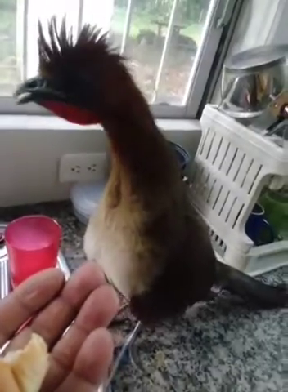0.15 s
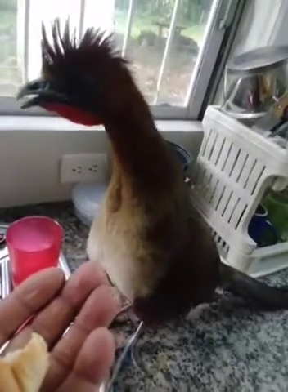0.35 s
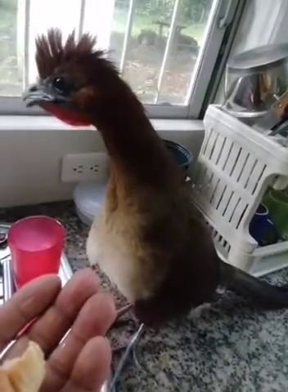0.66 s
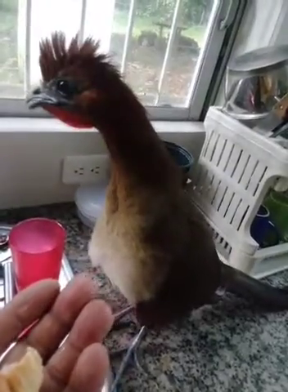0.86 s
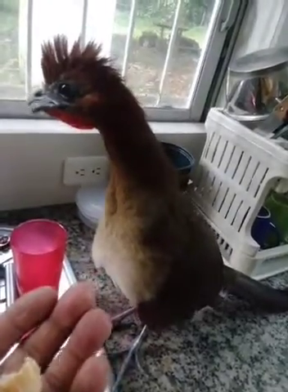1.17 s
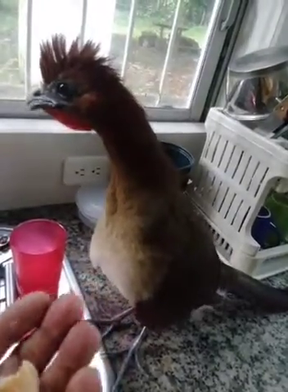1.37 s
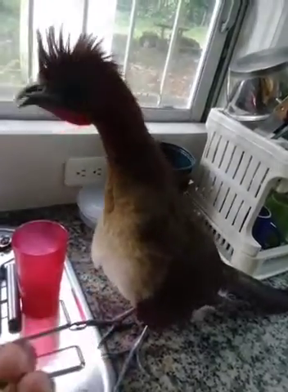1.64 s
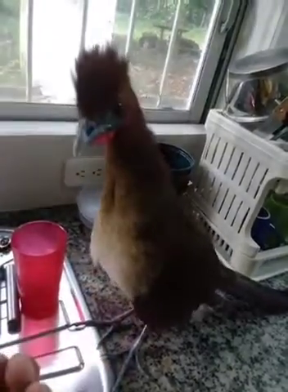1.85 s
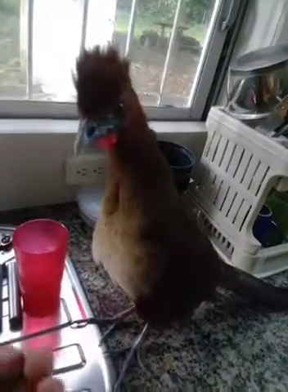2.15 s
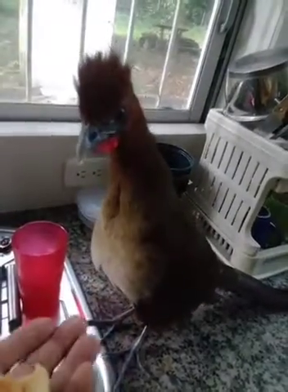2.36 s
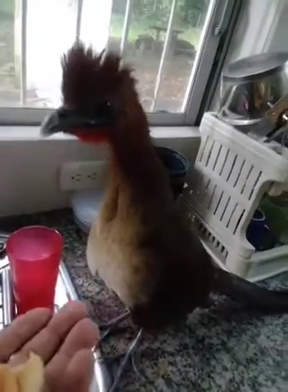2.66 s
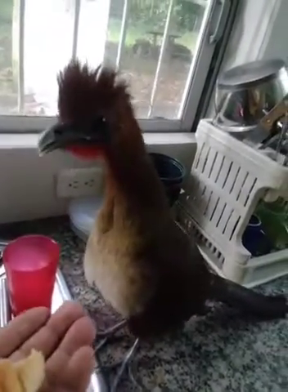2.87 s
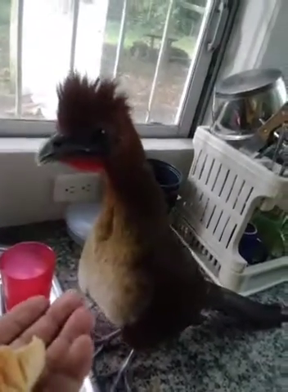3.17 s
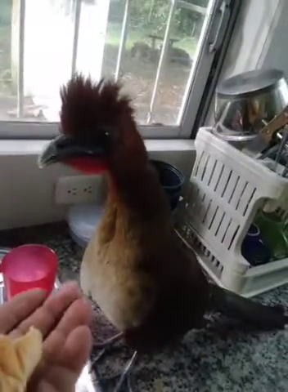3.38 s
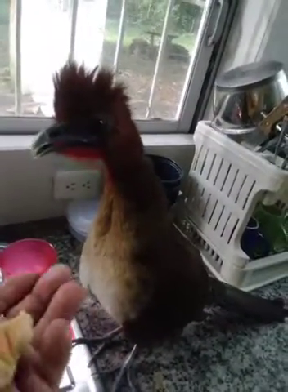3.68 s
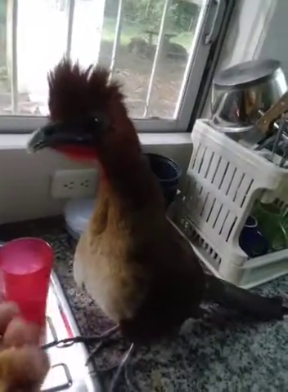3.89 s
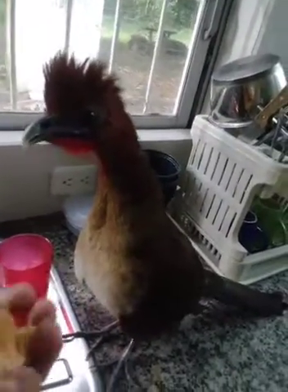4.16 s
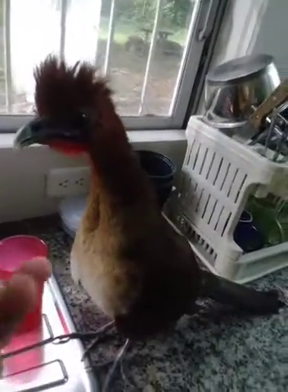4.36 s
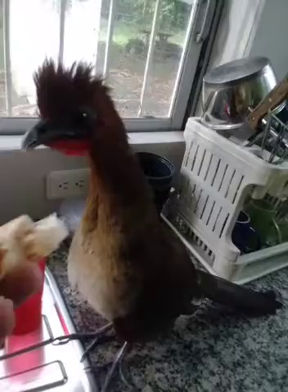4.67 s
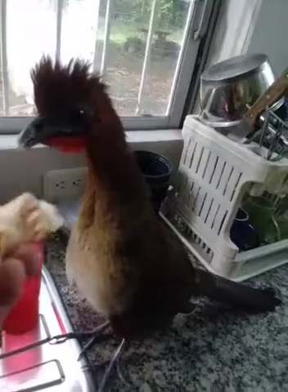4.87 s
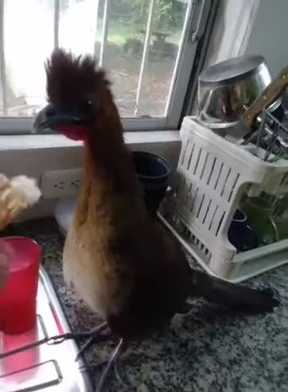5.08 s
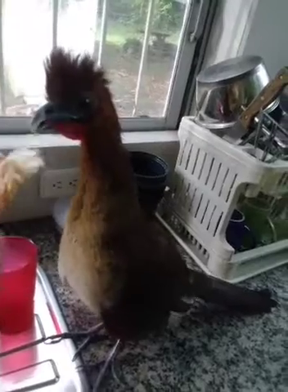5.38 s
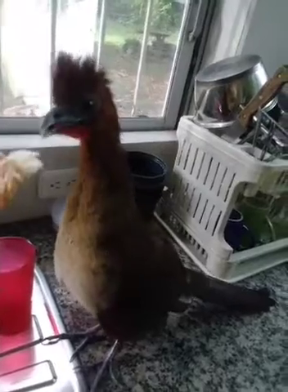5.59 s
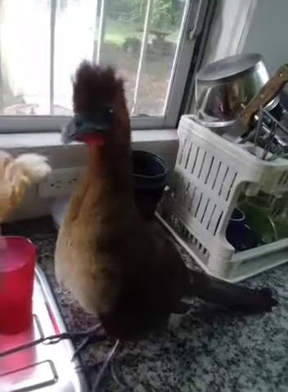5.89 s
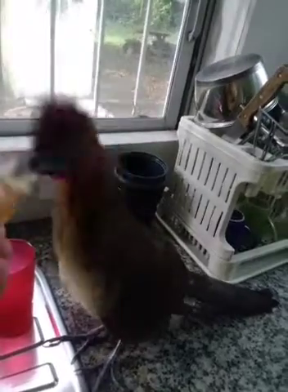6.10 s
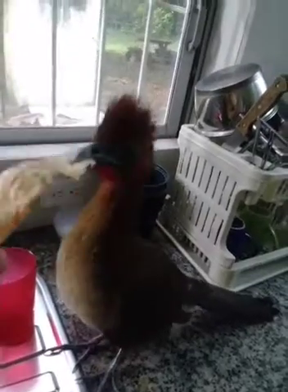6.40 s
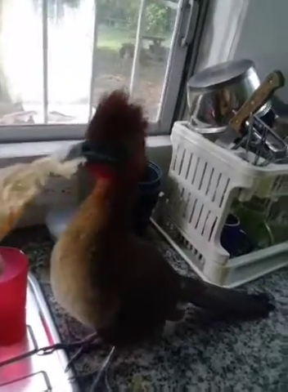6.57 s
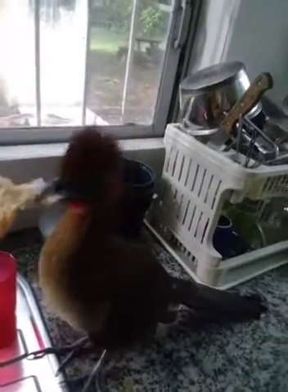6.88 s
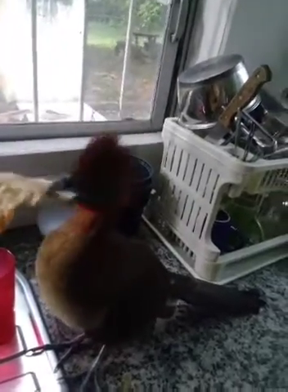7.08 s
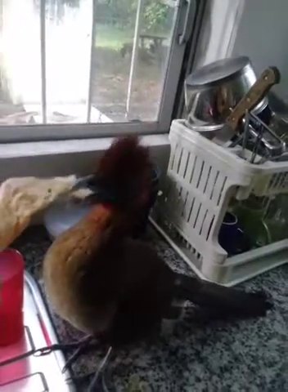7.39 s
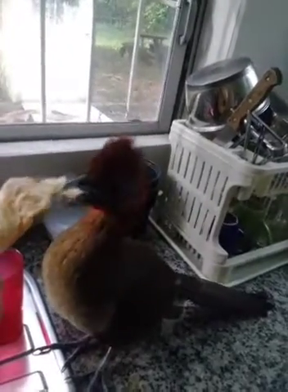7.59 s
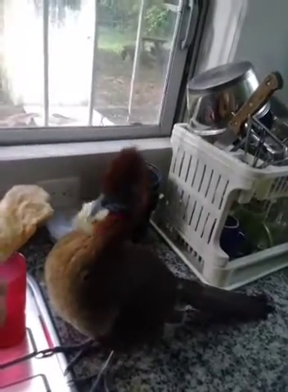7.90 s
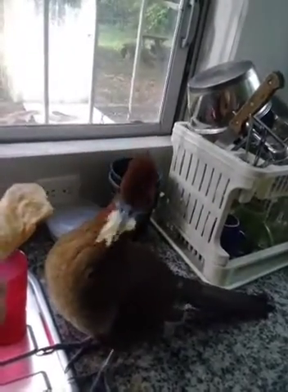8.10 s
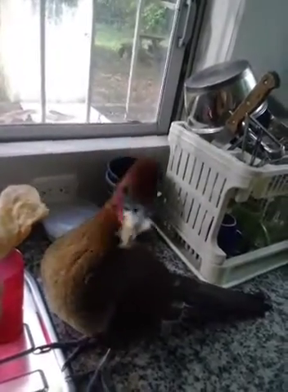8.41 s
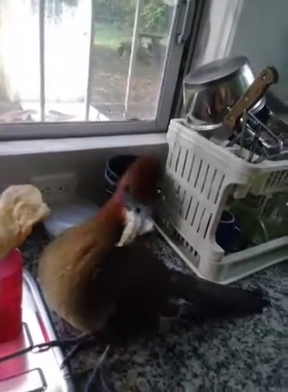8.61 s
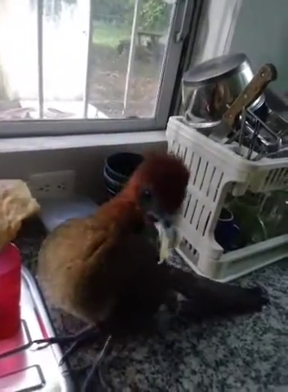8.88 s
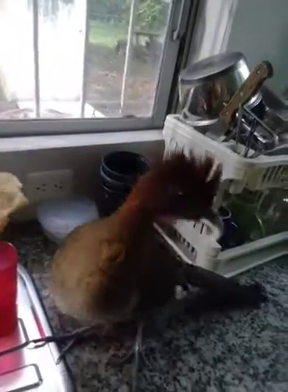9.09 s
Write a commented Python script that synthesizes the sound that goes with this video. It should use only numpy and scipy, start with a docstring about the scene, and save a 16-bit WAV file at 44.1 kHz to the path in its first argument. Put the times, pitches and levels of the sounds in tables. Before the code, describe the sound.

A large bird, a chachalaca, calls close by in a hard-walled kitchen. From the very start it repeats one harsh pattern: three quick, raspy barks, then a longer cry that begins as a croak, leaps to a clear high note and cracks back down into a rasp. The pattern comes about every 0.8 seconds, eight times, loud and even until about 6.3 seconds. From around 6.5 seconds the bird lowers its head and the calls turn softer, lower and more muffled, with looser spacing between barks. Quieter cries come near 7, 7.9 and 8.9 seconds, and one very faint coo sounds at about 7.3 seconds. Each call has a short, dense room echo. A faint refrigerator-like hum and soft room air continue underneath throughout. The small microphone thins the bass of the calls.

```python
"""In a hard-walled kitchen a chachalaca calls close by: a few short barks, then one long cry, repeated.
Its voice organ, the syrinx, rasps in uneven pulses when slack; pulled tight it sings clean and jumps
between the resonances of the long windpipe. Later the bird lowers its head to feed and calls more softly.
A hum like a refrigerator's lies below, and a small microphone thins the bass of the calls."""
import sys
import numpy as np
from scipy import signal
from scipy.fft import rfft, irfft
from scipy.io import wavfile
from scipy.ndimage import uniform_filter1d

SR = 44100
rng = np.random.default_rng(int(sys.argv[2]) if len(sys.argv) > 2 else 0)


def to_wav(s):
    """Save 16-bit WAV."""
    ch = np.atleast_2d(s).T  # columns
    pcm = np.round(np.clip(ch, -1, 1) * 32767)  # PCM
    wavfile.write(sys.argv[1], SR, pcm.astype(np.int16))


N = 407925

# tones of the motor: f/Hz, level/dB
HUM_TONES = [(121, -81), (241, -65), (619, -82), (10767, -90)]
# tone colour of the room air: f/Hz, relative level/dB
AIR_SPECTRUM = [(30, -42), (60, -34), (120, -18), (300, -7.5), (700, -12.5), (2000, -16), (3200, -28),
                (6000, -37.5), (10000, -41.5), (15800, -36)]
# how long echoes take to fade by 60 dB: f/Hz, t/s
ECHO_TIMES = [(300, 0.72), (1000, 0.39), (2800, 0.59), (7000, 0.48), (13000, 0.32)]
# windpipe resonances, head raised: f/Hz, width/Hz, gain/dB
WINDPIPE = [(360, 368, -9.5), (842, 243, -4), (1226, 186, -4.5), (1767, 180, -3.5), (1965, 373, -6),
            (2424, 447, -10)]
# the same, head lowered: f/Hz, width/Hz, gain/dB
WINDPIPE_LOWERED = [(414, 286, 0.5), (766, 107, 8.5), (1180, 71, 8), (1796, 294, 1), (2180, 252, -3),
                    (2585, 233, -0.5), (2636, 725, -7), (3130, 117, -6)]
# resonances of the beak and the airy hiss above them: f/Hz, width/Hz, gain/dB
BEAK_MODES = [(3130, 450, -1), (6150, 2700, -27), (3940, 1050, 2.5), (4656, 613, 8.5), (5282, 323, 2.5),
              (7370, 1700, -13), (10430, 3200, -21)]
# how the beak's opening colours the rasp: t/s, mouth resonance f/Hz, treble level/dB
BEAK_OPENING = [(0, 1500, -18.5), (3, 1420, -19.5), (6, 1620, -17), (6.58, 1570, -21.5), (6.84, 1150, -35),
                (6.95, 1360, -28), (7.64, 1310, -34), (7.8, 1580, -26.5), (7.9, 2270, -20),
                (8.9, 2190, -20)]
# harmonics 1-6 of the clean tone at the syrinx: relative level/dB
HARMONICS_DB = [5, 14, 16.5, 2, -6, 0.5]
# one soft coo: start t/s, loudest t/s, end t/s, f/Hz, level/dB
SOFT_COO = (7.28, 7.33, 7.47, 505, -43)
# short barks: start t/s, top f/Hz, time until just past the peak t/s, level/dB
BARK_CALLS = [(-0.03, 641, 0.035, -14), (0.089, 659.3, .035, -16), (0.211, 766, 0.046, -16),
              (0.756, 816, 0.071, -18.5), (0.885, 602.3, 0.042, -17.5), (0.996, 625, 0.048, -16.5),
              (1.529, 705, 0.06, -16.5), (1.65, 655.4, 0.04, -17), (1.769, 640, 0.051, -15.5),
              (2.397, 742, 0.057, -14.5), (2.524, 625.5, 0.039, -14.5), (2.64, 680.6, .042, -15),
              (3.206, 809.4, 0.061, -15), (3.33, 628, 0.047, -15), (3.448, 633, 0.046, -14.5),
              (4.018, 660, 0.053, -15.5), (4.136, 738, 0.059, -16), (4.269, 623.6, 0.048, -16),
              (4.831, 819.5, 0.062, -17), (4.956, 602.4, 0.047, -16.5), (5.079, 634, .042, -17),
              (5.696, 808, 0.056, -16.5), (5.821, 625, 0.053, -17.5), (5.944, 675, 0.049, -17),
              (6.576, 513.7, 0.063, -22.5), (6.71, 478.3, 0.051, -23.5), (6.835, 493, 0.05, -25),
              (7.637, 518, 0.066, -28), (7.791, 522.5, 0.069, -28.5), (8.142, 420.5, 0.032, -24.5),
              (8.479, 525, 0.062, -24.5), (8.62, 511, 0.044, -28.5), (8.745, 537.7, 0.066, -23.5)]
# a bark's swell at start, early, peak, just past the peak, sinking, closing and end: relative level/dB
BARK_SHAPE_DB = [-16.5, -6.5, 2, -0.5, -2.5, -7.5, -25]
# long cries: t/s of start, lift, jump, drop, landing, crack and end; top f/Hz;
# level/dB of croak, climb, top, fall and tail
CRY_CALLS = [(0.300, 0.333, 0.376, 0.418, 0.442, 0.470, 0.545, 1260, -21, -14.5, -18, -11, -15),
             (1.085, 1.130, 1.160, 1.217, 1.222, 1.265, 1.335, 1240, -20, -16, -19.5, -12, -15.5),
             (1.893, 2.003, 2.030, 2.090, 2.095, 2.138, 2.203, 1260, -16, -16.5, -20, -13, -16),
             (2.752, 2.810, 2.835, 2.896, 2.903, 2.932, 3.005, 1215, -17, -16, -16, -10.5, -14),
             (3.548, 3.617, 3.643, 3.697, 3.703, 3.742, 3.815, 1215, -18, -15.5, -16, -10.5, -14.5),
             (4.378, 4.417, 4.445, 4.503, 4.521, 4.548, 4.622, 1232, -17, -16, -18, -10.5, -15.5),
             (5.195, 5.272, 5.303, 5.361, 5.370, 5.402, 5.472, 1215, -19.5, -17, -21, -12, -15),
             (6.035, 6.085, 6.113, 6.157, 6.170, 6.213, 6.285, 1228, -21, -18, -22, -16, -20),
             (6.940, 7.005, 7.045, 7.084, 7.089, 7.140, 7.210, 1130, -27, -25, -28, -23, -21),
             (7.895, 7.985, 8.015, 8.055, 8.062, 8.095, 8.140, 1070, -28, -29, -29, -23, -24),
             (8.870, 8.975, 9.012, 9.046, 9.052, 9.085, 9.175, 1050, -26, -23, -26, -23.5, -22)]
# a cry's roughness follows tension, and so pitch; on the way up: f/Hz, roughness/0-1
ROUGH_UP = [(430, .85), (500, .7), (650, .75), (800, .15), (1130, .01)]
# on the way down: f/Hz, roughness/0-1
ROUGH_DOWN = [(510, .9), (690, .8), (790, .15), (1000, .4), (1180, .015)]

AIR_DB, ECHO_DB = -55, -9.5
MIC_LOW_HZ, CUTOFF_HZ = 322, 15800
FEEDING_S = 6.4   # calls after this are made with the head lowered
LEAK_EDGE_HZ = 825   # above this pitch, roughness stops letting high harmonics through
TREBLE_PER_EFFORT = .49   # dB of rasp treble for each dB of effort
BARK_FIRST_HZ, BARK_END_HZ, BARK_RISE_HZ_PER_S = 495.3, [413.3, 377.6], 15000
BARK_BREAK_S, BARK_SAG_S = .004, .019   # after the top: time to turn rough, time to sink in pitch
BARK_CLOSE_S, BARK_FADE_S = .058, .024
CROAK_HZ, CLIMB_HZ, FALL_HZ, CRACK_HZ = [420, 450, 490], [795, 905], [950, 850, 785], [465, 395]
CRACK_S, CRY_FADE_S = .01, .015
CRY_WIDER_HZ, CRY_BRIGHTER_DB = 201, 3.5   # the beak opens wider for a cry


def amp(db):
    """Turn decibels into a gain."""
    return 10 ** (np.asarray(db, float) / 20)


def at_hz(points, hz):
    """Read between the rows of a table, with frequency spaced by octaves."""
    freqs, values = np.transpose(points)
    return np.interp(np.log(hz + 1), np.log(freqs), values)


def hum_and_air():
    """A motor hums over the soft rush of room air; each tone wavers a little in loudness."""
    t, hz = np.arange(N) / SR, np.arange(N // 2 + 1) * SR / N
    air = irfft(rfft(rng.standard_normal(N)) * amp(at_hz(AIR_SPECTRUM, hz)), N)
    wavers = uniform_filter1d(rng.standard_normal((len(HUM_TONES), N)), 9000, axis=1)
    hum = sum(np.sqrt(2) * amp(db + 170 * waver) * np.sin(2 * np.pi * f * t)
              for (f, db), waver in zip(HUM_TONES, wavers))
    return amp(AIR_DB) * air / air.std() + hum


def kitchen_echoes(x):
    """Hard walls throw back dense echoes; the bass lingers longest, the highest treble dies first."""
    t = np.arange(int(.7 * SR)) / SR
    edges = 150 * 2 ** np.arange(0, 7, .5)
    tail = 0
    for low, high in zip(edges, edges[1:]):
        bandpass = signal.butter(2, [low, high], "band", fs=SR, output="sos")
        band = signal.sosfilt(bandpass, rng.standard_normal(len(t)))
        tail = tail + band * amp(-60 * t / at_hz(ECHO_TIMES, np.sqrt(low * high)))
    tail *= np.clip((t - .003) / .00097, 0, 1)   # the nearest wall answers after 3 ms
    return signal.fftconvolve(x, tail / np.sqrt(np.sum(tail ** 2)))[:N]


def coo():
    """A faint pure tone swells and fades just after a cry."""
    start, loud, end, hz, db = SOFT_COO
    t = np.arange(N) / SR
    return amp(db) * np.interp(t, [start, loud, end], [0, 1, 0]) * np.sin(2 * np.pi * hz * t)


def resonate(x, hz, width_hz):
    """Air in a hollow rings at one frequency; the narrower the width, the longer it rings."""
    r = np.exp(-np.pi * width_hz / SR)
    gain = (1 - r * r) / 2
    return signal.lfilter([gain, 0, -gain], [1, -2 * r * np.cos(2 * np.pi * hz / SR), r * r], x)


def ring(x, modes):
    """Several resonances ring side by side, with alternating signs."""
    return sum((-1) ** k * amp(db) * resonate(x, hz, width) for k, (hz, width, db) in enumerate(modes))


def even_out(x, window_s):
    """Hold the short-term average level at 1."""
    size = int(window_s * SR)
    return x / np.sqrt(uniform_filter1d(uniform_filter1d(x ** 2, size), size) + 1e-9)


def beak_at(time_s):
    """Look up the mouth resonance (Hz) and rasp treble (dB) at one moment."""
    times, *columns = np.transpose(BEAK_OPENING)
    return [np.interp(time_s, times, column) for column in columns]


def clean_tone(cycles, pitch, rough, effort_db, lowered):
    """The tight syrinx swings evenly and rings the windpipe and beak; effort makes it brighter."""
    pipe, edge_hz = (WINDPIPE_LOWERED, 2200) if lowered else (WINDPIPE, 1900)
    leak = rough / (1 + (pitch / LEAK_EDGE_HZ) ** 20)   # a cracking tone lets high harmonics through
    tone = 0
    for k, db in enumerate(HARMONICS_DB, 1):
        passed = leak + 1 / (1 + (k * pitch / edge_hz) ** 8)
        tone = tone + amp(db + .12 * (k - 1) * effort_db) * passed * np.cos(2 * np.pi * k * cycles)
    return even_out(ring(tone, pipe) + amp(-11) * tone + amp(-6) * ring(tone, BEAK_MODES[2:5]), .005)


def rasp(cycles, pitch, rough, noises, mouth_hz, treble_db, lowered):
    """The slack syrinx slaps once a cycle, then puffs air; the slacker, the more uneven the slaps."""
    timing, strength, breath = noises
    # the lowered head hides the highest hiss
    pipe, beak = (WINDPIPE_LOWERED, BEAK_MODES[:-1]) if lowered else (WINDPIPE, BEAK_MODES)
    due = np.flatnonzero(np.diff(np.floor(cycles)) > 0)
    shift = (.13 * (.15 + rough[due] ** 2) * timing[due] * SR / pitch[due]).astype(int)
    slaps = np.zeros(len(cycles))
    slaps[np.clip(due + shift, 0, len(slaps) - 1)] = amp(3.5 * rough[due] * strength[due])
    puffs = (2.4 + rough) * breath * signal.lfilter([1], [1, -.98], slaps)
    body = ring(slaps + .03 * puffs, pipe)
    body += 3.27 * resonate(body, mouth_hz, 680)
    treble = ring(slaps + .2 * puffs, beak)
    return even_out(body / body.std() + amp(treble_db) * treble / treble.std(), .0056)


def syrinx(bird, times, hz, db, roughness, mouth_hz, treble_db):
    """Add one breath through the syrinx to the bird's sound: roughness 0 is clean tone, 1 is all rasp."""
    samples = np.arange(int(times[0] * SR), min(int(times[-1] * SR), N))
    lowered = times[0] > FEEDING_S
    pitch, level, rough = (np.interp(samples / SR, times, curve) for curve in (hz, db, roughness))
    *noises, drift = rng.standard_normal((4, len(samples)))
    waver = 1 + (.35 + .5 * rough) * uniform_filter1d(drift, 300)   # a slack membrane holds pitch badly
    cycles = np.cumsum(uniform_filter1d(pitch, 90) * waver) / SR + rng.random()
    effort_db = np.maximum(level - level.max(), -20)
    clean = clean_tone(cycles, pitch, rough, effort_db, lowered)
    harsh = rasp(cycles, pitch, rough, noises, mouth_hz, treble_db + TREBLE_PER_EFFORT * effort_db, lowered)
    fade_in = np.minimum((samples - samples[0]) / (.004 * SR), 1)
    bird[samples] += fade_in * amp(level) * (np.sqrt(1 - rough) * clean + np.sqrt(rough) * harsh)


def barks(bird):
    """A bark swells from a clean, rising croak, breaks into rasp at its top and is cut off."""
    for start, top_hz, past_peak, db in BARK_CALLS:
        t = np.linspace(max(-start, 0), BARK_CLOSE_S + BARK_FADE_S, 40)
        croak_s = .022 if start > FEEDING_S else .012
        to_top = croak_s + max(top_hz - BARK_FIRST_HZ, 0) / BARK_RISE_HZ_PER_S
        hz = np.interp(t, [0, .7 * to_top, to_top, to_top + BARK_SAG_S, t[-1]],
                       [BARK_FIRST_HZ, top_hz, .97 * top_hz, *BARK_END_HZ])
        sinking = (past_peak + BARK_CLOSE_S) / 2
        stages = [0, .25 * past_peak, .65 * past_peak, past_peak, sinking, BARK_CLOSE_S, t[-1]]
        swell_db = np.interp(t, np.sort(stages), BARK_SHAPE_DB)
        rough = np.interp(t, [0, to_top, to_top + BARK_BREAK_S], [.05, .3, .9])
        syrinx(bird, start + t, hz, db + swell_db, rough, *beak_at(start))


def cries(bird):
    """A cry jumps up the windpipe's resonances and cracks on the way down; tension keeps it clean."""
    for start, lift, jump, drop, landing, crack, end, top_hz, *levels in CRY_CALLS:
        croak_db, climb_db, top_db, fall_db, tail_db = levels
        lowered = start > FEEDING_S   # head lowered: slower glides, a sagging top, never fully clean
        jump_s, drop_s, sag, least_rough = (.016, .01, .93, .22) if lowered else (.008, .007, 1, 0)
        croak_times = start + (lift - start) * np.array([0, .3, .5 if lowered else .7])
        # croak, climb, top, fall, cracked tail, fade: t/s, f/Hz, level/dB
        stages = [(croak_times, CROAK_HZ, [croak_db - 8.5, croak_db, croak_db - 3]),
                  ([lift, jump - jump_s], CLIMB_HZ, [climb_db, climb_db - 2.3]),
                  ([jump, drop - drop_s], [top_hz, sag * top_hz], [top_db - 6, top_db]),
                  ([drop, landing, crack - CRACK_S], FALL_HZ, [fall_db - 10, fall_db, fall_db - .5]),
                  ([crack, end], CRACK_HZ, [tail_db, tail_db - 5.5]),
                  ([end + CRY_FADE_S], CRACK_HZ[-1:], [tail_db - 29])]
        times, pitches, dbs = (np.concatenate(column) for column in zip(*stages))
        t = np.linspace(start, times[-1], 160)
        hz, db = np.interp(t, times, pitches), np.interp(t, times, dbs)
        rising, falling = (np.interp(hz, *np.transpose(table)) for table in (ROUGH_UP, ROUGH_DOWN))
        rough = np.maximum(np.where(t < drop - drop_s, rising, falling), least_rough)
        mouth_hz, treble_db = beak_at(start)
        syrinx(bird, t, hz, db, rough, mouth_hz + CRY_WIDER_HZ, treble_db + CRY_BRIGHTER_DB)


def scene():
    """The microphone rounds the peaks and thins the bass of bird and echoes; hum and air lie below."""
    bird = coo()
    barks(bird)
    cries(bird)
    rounded = np.tanh(bird + amp(ECHO_DB) * kitchen_echoes(bird))
    thin = signal.sosfilt(signal.butter(3, MIC_LOW_HZ, "high", fs=SR, output="sos"), rounded)
    return (thin + hum_and_air())[None]


def record(dry):
    """A steep filter cuts off the highest treble."""
    return signal.sosfilt(signal.ellip(10, .5, 70, CUTOFF_HZ, fs=SR, output="sos"), dry)


dry = scene()
out = record(dry)
to_wav(out)
```